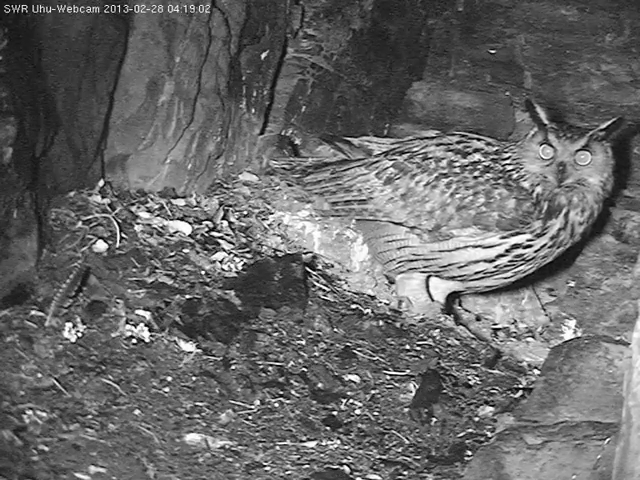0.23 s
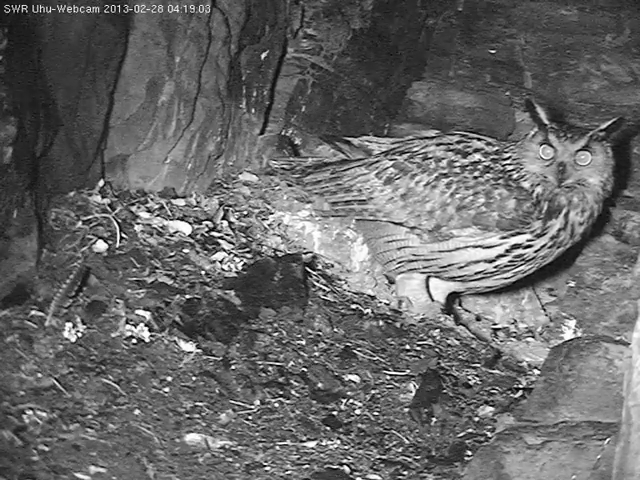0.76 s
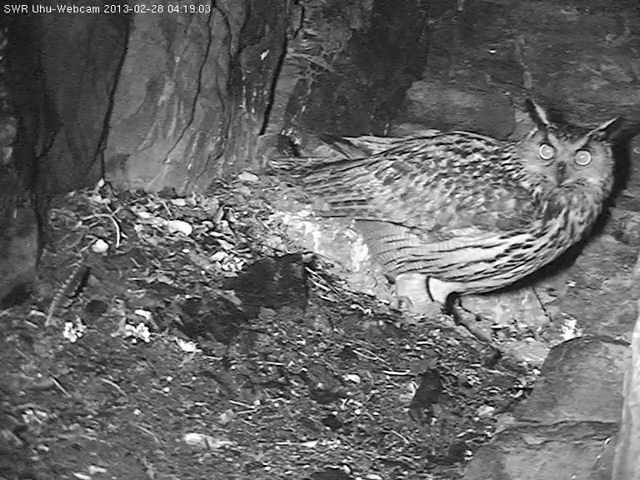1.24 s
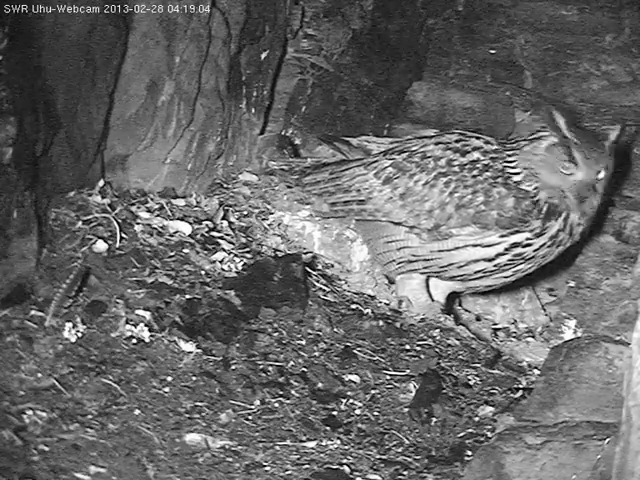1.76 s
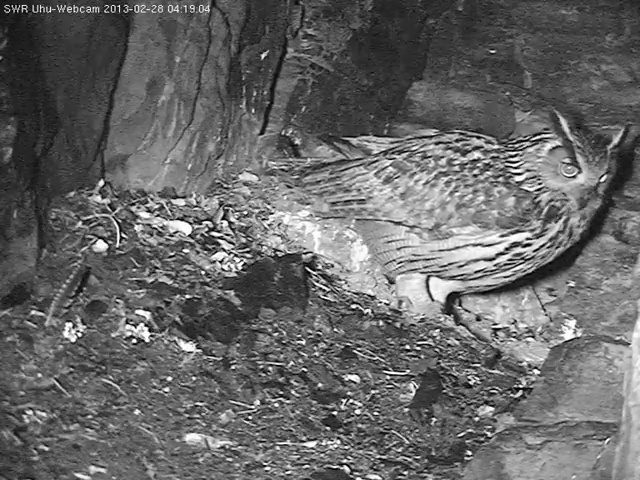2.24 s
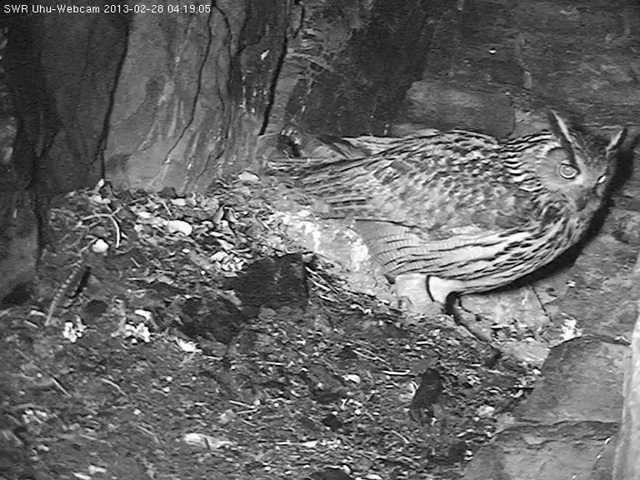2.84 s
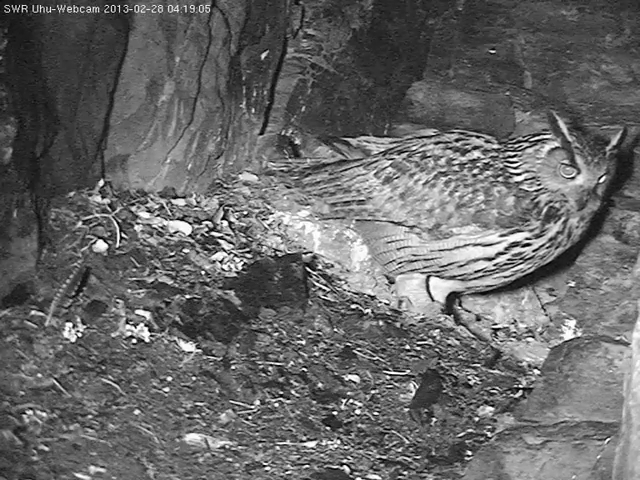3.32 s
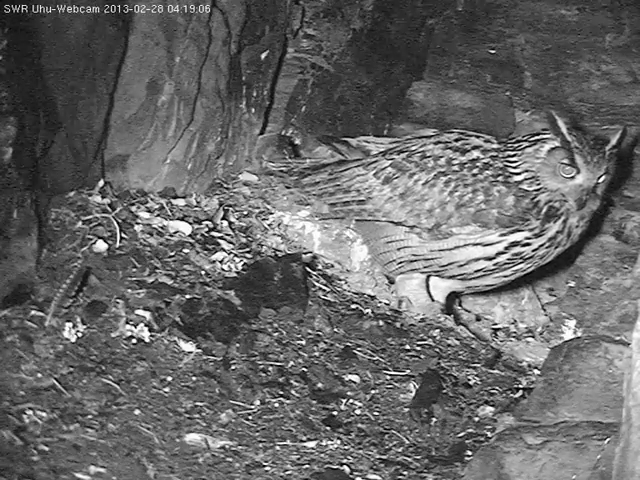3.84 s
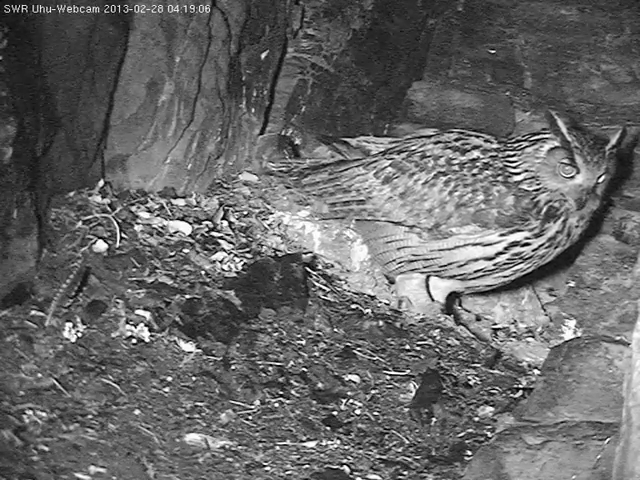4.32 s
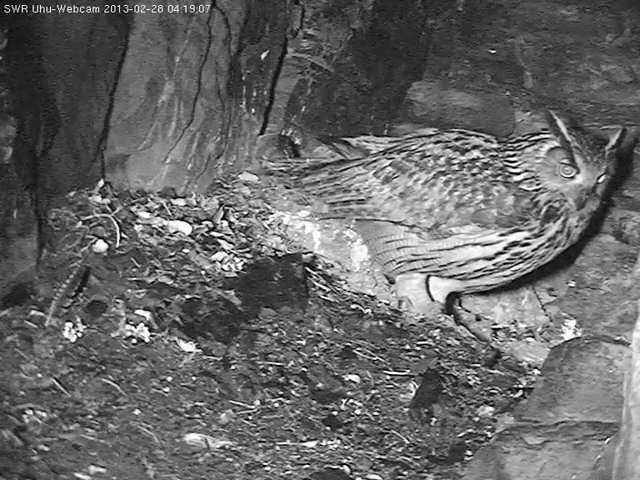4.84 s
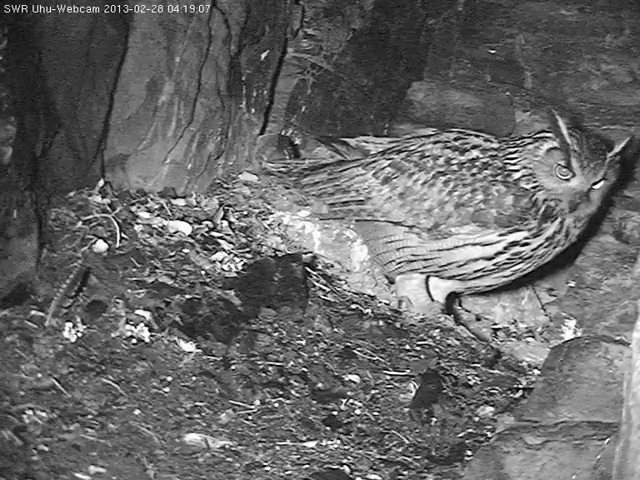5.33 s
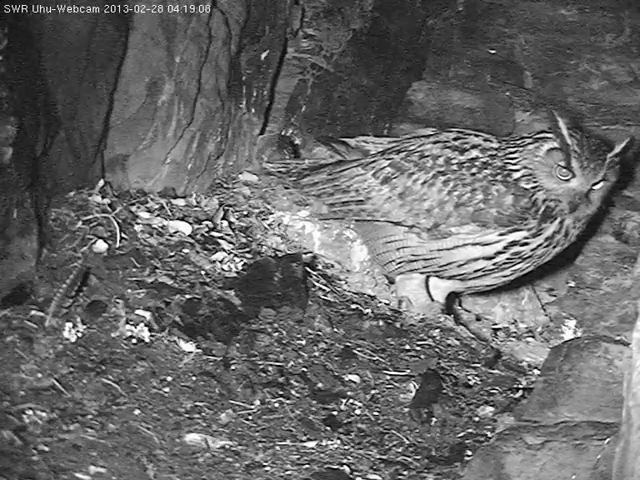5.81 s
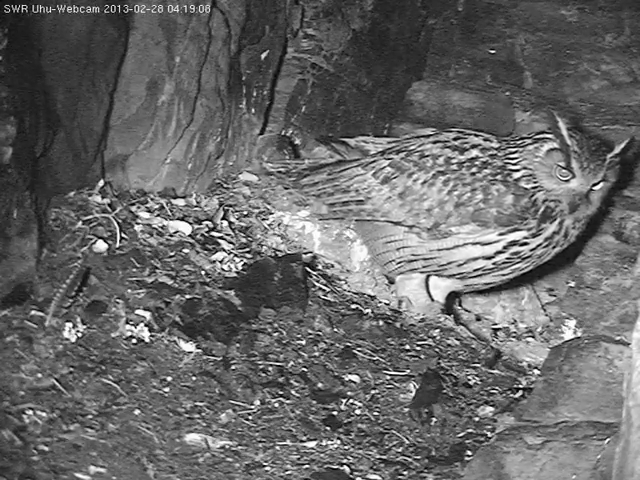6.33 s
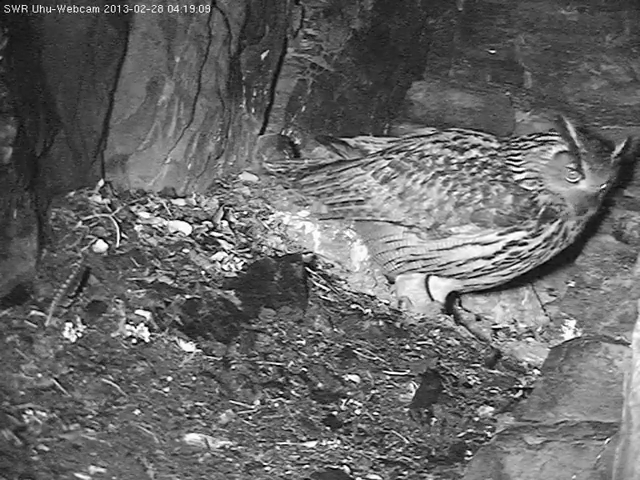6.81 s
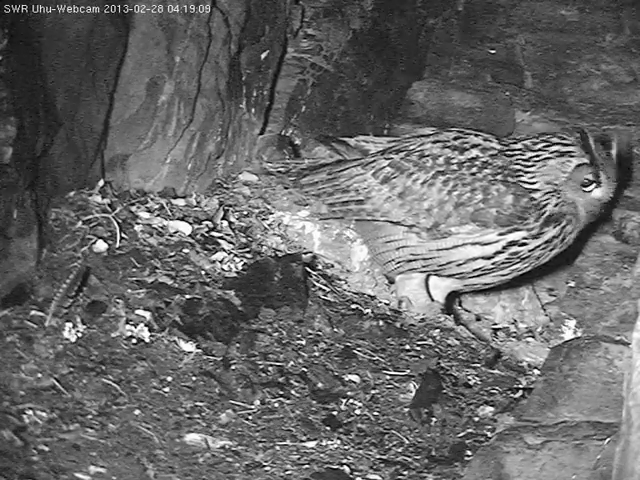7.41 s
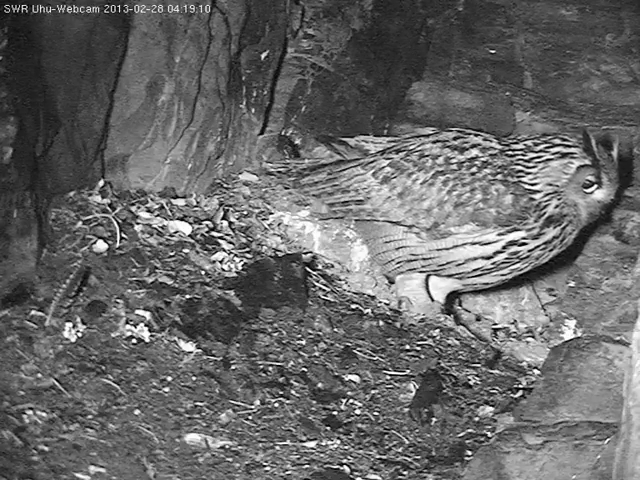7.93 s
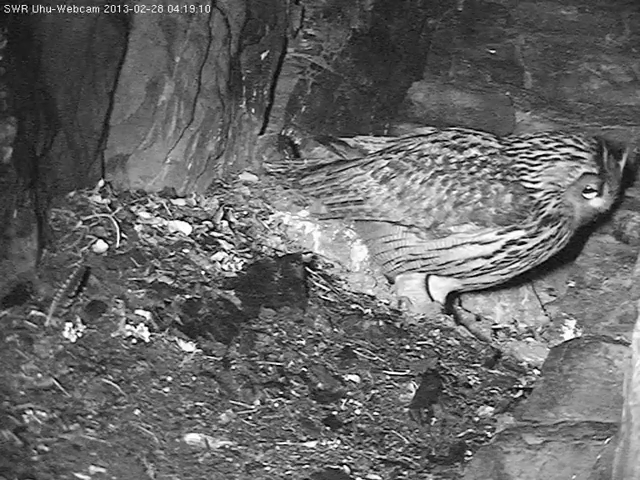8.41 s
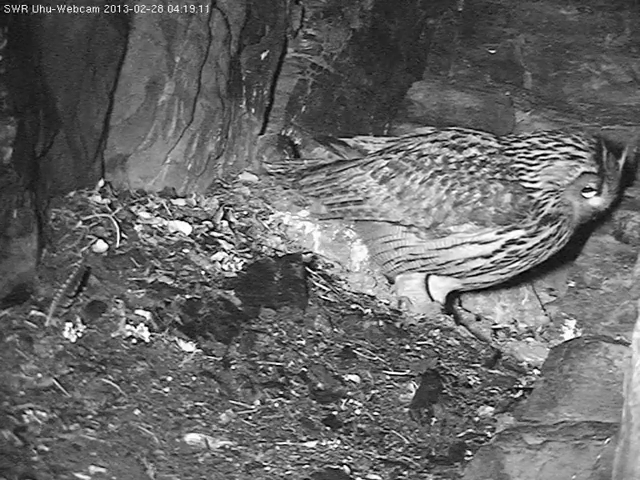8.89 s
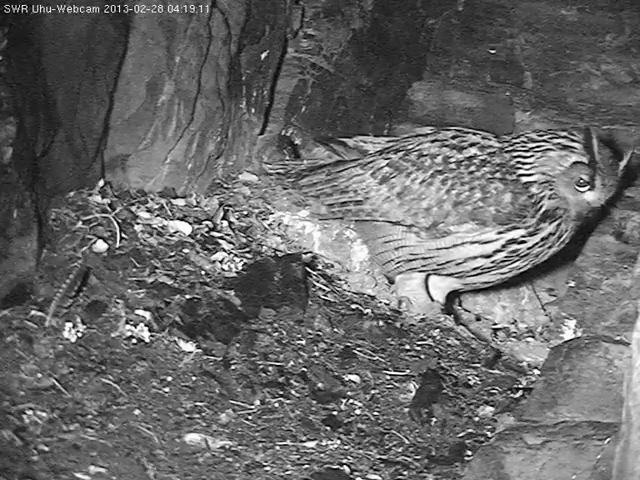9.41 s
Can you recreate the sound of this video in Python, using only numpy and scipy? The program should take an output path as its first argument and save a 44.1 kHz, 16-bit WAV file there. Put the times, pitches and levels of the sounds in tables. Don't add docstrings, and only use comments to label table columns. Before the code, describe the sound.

Quiet night air with a faint low hum and distant rush. At about 0.6 s a large owl, close by, makes a weak, creaky stutter. From 1.1 s it clucks in runs roughly every half second: each a low, hollow flutter of several quick throat pulses, rising and clipped, then a wheezy puff and often a slower closing cluck. At 2.1, 3.1 and 3.6 s longer drawls slow into a creak; around 2.66 s there is a barely felt gulp. After brief gaps near 3.8 and 4.3 s, the runs continue steadily from 4.6 s as doublets and triplets, with small nasal whistles between. Bright little gasps of air come at 6.7 and 7.3 s. From 7.8 s to the end, clucks are strongest and breathier, at 7.8, 8.3, 8.8 and 9.4 s. The sound is dry, midrange, with only a tiny rocky reflection and muted treble.

```python
import sys
import numpy as np
from scipy import signal
from scipy.fft import rfft, irfft, next_fast_len
from scipy.io import wavfile
from scipy.ndimage import uniform_filter1d

SR = 44100
rng = np.random.default_rng(int(sys.argv[2]) if len(sys.argv) > 2 else 0)


def amplitude_ratio(level_db):
    exponent = np.asarray(level_db, float) / 20
    return 10 ** exponent


def unload_wav(signal):
    wavfile.write(
        sys.argv[1],
        SR,
        np.round(np.clip(np.atleast_2d(signal).T, -1, 1) * 32767).astype(np.int16),
    )


N = 426006

# freq_hz, density_db
NIGHT_SPECTRUM = [(20, -14), (60, -7), (110, -12.5), (300, -11), (400, -6.5), (455, -0.5), (510, -9.5),
                  (1000, -8.5), (1400, -12.5), (3000, -16.5), (3500, -24), (7000, -24)]
NIGHT_DB = -58
# freq_hz, rms_db
HUM = [(50, -66.5), (150, -72.5)]
# freq_hz, t60_s
ROCK_DECAY = [(200, 0.017), (1000, 0.11), (6000, 0.015)]
# freq_hz, gain_db
MIC_RESPONSE = [(40, -12.5), (120, 4.5), (7000, -4), (7800, -8.5), (8500, -18.5), (8900, -45.5),
                (9600, -90)]

# freq_hz, width_hz
PIPE_NARROW = [(1001, 171), (553, 1210), (1810, 1600)]
PIPE_OPENED = [(885, 177), (703, 1760), (2480, 840)]
# freq_hz, width_hz, level_db
CHEST_NARROW = (167, 64, 0.7)
CHEST_OPENED = (194, 42.6, 0)
# freq_hz, width_hz, level_db
THROAT_SAC = (448.4, 63, 0)
# time_s, level_db
SAC_LEVEL = [
    (.9, 7),
    (2, 0),
]
# freq_hz, width_hz, level_db
BEAK = [(1780, 130, -1.5), (2362, 257, 0.5), (3470, 380, -5), (4310, 460, -4.5), (5180, 700, -8),
        (7130, 750, -13.5)]
# freq_hz, width_hz, level_db
BEAK_CLICK = [(1647, 150, -1), (2420, 340, -2.5), (3180, 1800, -9.5), (5400, 440, -8), (6100, 500, -12.5)]
# freq_hz, width_hz, level_db
GAPE = (3425, 150, 3.1)
# narrow_hz, opened_hz, width_hz, level_db
WHEEZE = [(500, 790, 140, -3.5), (1070, 960, 400, -2), (1232, 1000, 130, -13.5)]

# start_s, end_s, ring_db
GASPS = [
    (6.726, 6.754, 3),
    (7.327, 7.373, -5),
]
# time_s, level_db
GULPS = [
    (2.664, -24),
    (2.673, -25),
]
# start_s, length_s, level_db, octave_db (above the whistle)
SQUEAKS = [(0.683, 0.042, -51.7, 0.5), (2.046, 0.05, -45, -3.5), (2.093, 0.038, -47, -1.5),
           (2.561, 0.025, -47.5, -0.5), (2.596, 0.02, -56, 0), (2.62, 0.024, -51, 5.5),
           (3.053, 0.034, -51.5, 2), (3.532, 0.034, -48.5, -0.5), (4.664, 0.034, -49.4, 0),
           (4.74, 0.031, -53, 1.5), (5.201, 0.031, -52.5, 1), (5.725, 0.019, -58, 9),
           (5.79, 0.028, -49, -2), (6.292, 0.022, -52, -4), (6.816, 0.02, -47.5, 3), (6.911, 0.026, -50, 1),
           (7.416, 0.029, -51.5, 4.5), (7.52, 0.03, -52.5, 8), (7.936, 0.029, -49, 3),
           (7.981, 0.054, -52.5, 6), (8.423, 0.036, -51, 5), (8.513, 0.03, -62, 0),
           (8.957, 0.024, -48.5, 1.5), (9.042, 0.023, -51.5, 2.5), (9.481, 0.032, -52, 2),
           (9.578, 0.022, -51, -1)]
SQUEAK_HZ = 501

# start_s, length_s, held_hz, pulse_db, hiss_db
LEADS = [(1.0736, .0276, 244, -22.5, -59), (1.521, 0.033, 252.7, -20, -50),
         (1.9303, .0369, 262.7, -19, -47), (2.456, 0.015, 273, -19.5, -55), (2.948, .0333, 271.7, -20, -47),
         (3.417, .0355, 282.7, -19.5, -44), (3.9817, .0252, 262, -19.5, -53),
         (4.5657, .0295, 256.7, -19, -49.5), (5.0987, .0384, 250, -19, -51.5),
         (5.6029, 0.0452, 259.7, -18.5, -46.5), (6.0948, .0324, 267, -18.5, -47),
         (7.816, .0354, 268.8, -18, -43), (8.3134, .0397, 269.5, -18, -43.5),
         (8.8407, .0329, 269, -18, -45), (9.375, 0.0295, 263, -18.5, -47.5)]
LEAD_START_HZ, LEAD_RISE_S, CREEP_HZ_PER_S, LEAD_START_DB, LEAD_END_DB = 150.5, .0145, 650, -9, -1
# start_s, length_s, top_hz, last_hz, pulse_db
ARCHES = [(4.7, .0107, 186, 177, -21.5), (2.0726, .0209, 258, 229, -19), (3.562, .0163, 206, 142, -21.5),
          (5.2343, .0362, 214.6, 177, -21.5), (5.7443, .0204, 226, 133, -20.5),
          (6.2315, .0252, 264.4, 220, -19), (6.836, .0221, 256, 195, -18.5), (7.4454, .0184, 235, 217, -20),
          (8.9805, .0287, 264, 233, -18.5)]
ARCH_START_HZ, ARCH_RISE_S, ARCH_START_DB, ARCH_DB_PER_HZ = 195, .009, -4, .09
# start_s, length_s, top_hz (or dip), last_hz, pulse_db
DRAWLS = [
    (0.6334, .0292, 158, 189, -29),
    (.733, 0.064, 170, 112, -28.5),
    (2.133, .0653, 218.8, 102, -21.5),
    (3.0853, .0973, 240.8, 122, -23),
    (3.6066, 0.055, 216.3, 107.4, -23),
]
DRAWL_START_HZ, DRAWL_RISE_S, DRAWL_START_DB, DRAWL_END_DB = 181, .012, -1.5, -2
# start_s, length_s, first_hz, first_db (over the rest), pulse_db
CLOSERS = [(1.2046, 0.015, 168, -8, -27), (1.668, 0.015, 165, -8.5, -24.5),
           (4.1336, 0.043, 151.8, 2, -26.5), (5.8266, 0.027, 170, -4, -23.5),
           (6.3132, 0.034, 195, 0, -22.5), (6.9416, .0361, 171, .3, -23.5), (7.5547, .0334, 191, 2.5, -23),
           (7.9682, .007, 160, -4, -30.5), (8.0363, .0418, 175.4, -6, -21), (8.5362, 0.024, 157, -8, -20.5),
           (9.0815, 0.016, 135.9, -3, -23), (9.5156, .0074, 150.3, -3, -33),
           (9.6161, 0.0084, 130.3, -3.5, -25)]
CREAK_HZ, CLOSER_RISE_S, CLOSER_END_DB = 109.9, .007, 0.44
CLOSER_AIR_S, SPENT_DB = .0345, -5.5
LAST_BEAT_DB = -2

HISS_START_DB, HISS_OPEN_DB, HISS_OPEN_S, HISS_TOP_SHARE, HISS_END_DB = -21.5, -5, 0.0044, .65, -5
ARCH_HISS_DB, ARCH_HISS_LATE_DB, DRAWL_HISS_DB, CLOSER_HISS_DB = -37, -9, -41.5, -43.5

# start_s, length_s, wheeze_db, hiss_db
PUFFS = [(1.104, .028, -48, -59), (1.556, 0.0252, -47, -52), (1.97, 0.02215, -43, -52.5),
         (2.477, 0.03375, -45, -53), (2.984, 0.0239, -44, -52), (3.455, 0.02353, -41, -49),
         (4.012, .029, -43.5, -56), (4.599, 0.037, -44, -55), (5.14, .027, -45.5, -59),
         (5.651, 0.0203, -45.5, -56), (6.13, 0.0211, -44.5, -57.5), (6.719, .033, -42, -51.5),
         (6.861, .035, -42, -54.5), (7.325, .04, -40.5, -50.5), (7.855, 0.02416, -40, -52),
         (8.356, .022, -38, -52.5), (8.878, .025, -38, -52.5), (9.409, .028, -41.5, -54.5)]
PUFF_ATTACK_S, PUFF_RELEASE_S, PUFF_SAG_DB = .004, .009, -5
PUFF_OPENS = (.3, .9)
# start_s, length_s, wheeze_db, opening (0-1)
SIGHS = [(0.665, .066, -60.5, .15), (1.179, 0.02, -55.5, 0.16), (1.633, .022, -46, 0.77),
         (2.043, 0.02593, -49.5, 0.44), (2.096, .035, -47, 0.66), (2.528, .11, -48.5, .85),
         (3.056, .028, -51.5, .5), (3.522, .038, -52, 0.7), (4.044, .08, -63.5, .5),
         (4.629, .07, -48.5, 0.62), (4.722, .045, -45.5, .8), (5.186, .045, -50.5, .6),
         (5.286, .032, -47.5, .95), (5.714, 0.0283, -50, 0.62), (5.763, .055, -48, 0.5),
         (6.206, .022, -50.5, 0.28), (6.254, .053, -44.5, 0.52), (6.805, 0.01996, -48.5, .4),
         (6.889, .05, -46, 0.66), (7.399, .045, -45, .7), (7.462, .087, -44.5, 0.76),
         (7.928, .036, -48, 0.51), (7.981, .05, -44, .4), (8.402, .055, -45, .75), (8.462, .07, -45, .7),
         (8.919, .06, -54, .8), (9.009, .066, -48, 0.67), (9.461, .052, -44, .85), (9.532, 0.021, -45, .5),
         (9.553, .048, -43, .9)]
SIGH_ATTACK_S, SIGH_RELEASE_S, SIGH_SAG_DB, SIGH_HISS_DB, SIGH_CLOSES = .008, .016, -2, -14, .15
WIDE_HISS_DB = -8


def unit(x):
    return x / np.sqrt(np.mean(x ** 2) + 1e-20)


def along(points, hz):
    f, v = np.transpose(points)
    return np.interp(np.log(hz + 1), np.log(f + 1), v)


def filtered(x, response):
    m = next_fast_len(N + SR // 2)
    return irfft(rfft(x, m) * response(np.fft.rfftfreq(m, 1 / SR)), m)[..., :N]


def series(modes):
    return lambda f: np.prod([c * c / (c * c - f * f + 1j * f * w) for c, w in modes], axis=0)


def parallel(modes):
    def response(f):
        total = 0
        for k, (c, w, db) in enumerate(modes):
            total = total + (-1) ** k * amplitude_ratio(db) * 1j * f * w / (c * c - f * f + 1j * f * w)
        return total
    return response


def spikes(s, size):
    i, part = np.divmod(s * SR, 1)
    places = np.r_[i, i + 1].astype(int)
    return np.bincount(places, np.r_[size * (1 - part), size * part], N + 2)[:N]


def night():
    z = signal.stft(rng.standard_normal(N), nperseg=512)[2]
    patches = uniform_filter1d(rng.standard_normal(z.shape), size=5, axis=0)
    patches = uniform_filter1d(patches, size=12, axis=1)
    rush = signal.istft(z * amplitude_ratio(.6 * unit(patches)), nperseg=512)[1][:N]
    rush = amplitude_ratio(NIGHT_DB) * unit(filtered(rush, lambda hz: amplitude_ratio(along(NIGHT_SPECTRUM, hz))))
    drift = amplitude_ratio(1.5 * unit(uniform_filter1d(rng.standard_normal(N), size=4000)))
    t = np.arange(N) / SR
    hum = sum(np.sqrt(2) * amplitude_ratio(db) * np.sin(2 * np.pi * hz * t) for hz, db in HUM)
    return rush + drift * hum


def rock(x):
    hz, t, z = signal.stft(rng.standard_normal(SR // 8), SR, nperseg=128)
    decay = amplitude_ratio(-60 * t / along(ROCK_DECAY, hz)[:, None])
    tail = signal.istft(z * decay, SR, nperseg=128)[1]
    delayed = np.pad(x, (130, 0))
    return signal.fftconvolve(delayed, tail / np.linalg.norm(tail))[:N]


def squeaks():
    tone, shut = np.zeros(N), np.zeros(N)
    variation = rng.standard_normal((len(SQUEAKS), 2))
    for (s, length, db, octave_db), (detune, lag) in zip(SQUEAKS, variation):
        u = np.linspace(0, 1, round(length * SR))
        waver = 100 * uniform_filter1d(rng.standard_normal(len(u)), size=90)
        hz = SQUEAK_HZ * (1.05 - 0.14 * u) + 6 * detune + waver
        turn = 2 * np.pi * np.cumsum(hz) / SR
        swell = np.sin(np.pi * u) ** 1.7
        whistle = np.sin(turn) + amplitude_ratio(octave_db) * np.sin(2 * turn + lag)
        tone[round(s * SR):][:len(u)] += np.sqrt(2) * amplitude_ratio(db) * swell * whistle
        shut[round(s * SR):][:len(u)] = np.sqrt(swell)
    return tone, shut


def clucks():
    for s, length, hz, db, hiss_db in LEADS:
        rise, top = min(LEAD_RISE_S, .99 * length), HISS_TOP_SHARE * length
        opens = [min(rise, top) - HISS_OPEN_S, min(rise + HISS_OPEN_S / 2, .9 * top)]
        at = np.sort([0, rise, top, length, *opens])
        knots = [0, rise, length]
        rate = np.interp(at, knots, [LEAD_START_HZ, hz, hz + CREEP_HZ_PER_S * (length - rise)])
        size = db + np.interp(at, knots, [LEAD_START_DB, 0, LEAD_END_DB])
        hiss_shape = [HISS_START_DB, HISS_OPEN_DB, 0, HISS_END_DB]
        yield s + at, rate, size, hiss_db + np.interp(at, [*opens, top, length], hiss_shape)
    for s, length, hz, last, db in ARCHES:
        at = np.array([0, ARCH_RISE_S, length])
        size = db + np.array([ARCH_START_DB, 0, ARCH_DB_PER_HZ * (last - hz)])
        hiss = size + ARCH_HISS_DB + np.array([ARCH_HISS_LATE_DB, 0, 0])
        yield s + at, [ARCH_START_HZ, hz, last], size, hiss
    for s, length, hz, last, db in DRAWLS:
        at = np.array([0, DRAWL_RISE_S, length])
        size = db + np.array([DRAWL_START_DB, 0, DRAWL_END_DB])
        yield s + at, [DRAWL_START_HZ, hz, last], size, size + DRAWL_HISS_DB
    for s, length, hz, first_db, db in CLOSERS:
        rise = min(CLOSER_RISE_S, .9 * length)
        end_db = CLOSER_END_DB + SPENT_DB * (length > CLOSER_AIR_S)
        size = db + np.array([first_db, 0, CLOSER_END_DB, end_db])
        at = np.array([0, rise, max(rise, length - 1 / CREAK_HZ), length])
        yield s + at, hz + (CREAK_HZ - hz) * at / length, size, size + CLOSER_HISS_DB


def beats():
    rows = []
    for s, hz, db, _ in clucks():
        held = hz[-1] > 1.15 * hz[0]
        t = np.arange(s[0], s[-1] + .5 / hz[-1], 1 / SR)
        turns = np.cumsum(np.interp(t, s, hz)) / SR
        whole = int(turns[-1])
        fit = 1 if held else whole / (turns[-1] - .5)
        beat = np.arange(whole + 1)
        when = np.interp(beat, fit * turns, t)
        rebound_db = 1.2 * (beat == 1) - 2.1 * (beat == 2)
        rebound_db += LAST_BEAT_DB * (beat == beat[-1]) * (len(beat) > 6)
        rows.append([when, fit * np.interp(when, s, hz), np.interp(when, s, db) + rebound_db])
    return np.hstack(rows)


def airflow():
    t = np.arange(N) / SR
    wheeze, hiss, opened = np.zeros((3, N))
    for s, _, _, hiss_db in clucks():
        on = slice(round(s[0] * SR), round((s[-1] + PUFF_ATTACK_S) * SR))
        hiss[on] += amplitude_ratio(np.interp(t[on], s, hiss_db))
    breaths = [(*row, PUFF_ATTACK_S, PUFF_RELEASE_S, PUFF_SAG_DB, *PUFF_OPENS) for row in PUFFS]
    for s, length, db, wide in SIGHS:
        hiss_db = db + SIGH_HISS_DB + WIDE_HISS_DB * (wide - .5)
        breaths.append((s, length, db, hiss_db, SIGH_ATTACK_S, SIGH_RELEASE_S, SIGH_SAG_DB,
                        wide + SIGH_CLOSES, wide - SIGH_CLOSES))
    for s, length, db, hiss_db, attack, release, sag_db, first, last in breaths:
        on = slice(round((s - attack / 2) * SR), round((s + length + release / 2) * SR))
        u = t[on] - s
        flow = np.clip(np.minimum(u / attack, (length - u) / release) + .5, 0, 1) ** 2
        pipe = flow * amplitude_ratio(db + sag_db * (u / length - .5))
        wheeze[on] += pipe
        hiss[on] += amplitude_ratio(hiss_db) * flow
        opened[on] += pipe * (first + (last - first) * u / length)
    return wheeze, hiss, np.clip(opened / (wheeze + 1e-9), 0, 1)


def blown(hz, width_hz):
    a, b = filtered(rng.standard_normal((2, N)), lambda f: 1 / (1 + 2j * f / width_hz) ** 2)
    turn = 2 * np.pi * np.cumsum(hz) / SR
    return unit(a * np.cos(turn) + b * np.sin(turn))


def windpipe_breath(opening):
    return sum(amplitude_ratio(db) * blown(low + (high - low) * opening, width) for low, high, width, db in WHEEZE)


def beak_noise(hiss, s, hz, effort, voiced, gusts):
    clicks = spikes(s - .0007, np.sqrt(SR / hz) * (0.62 + 0.49 * effort))
    burst = signal.fftconvolve(clicks, np.exp(-np.arange(300) / (.0011 * SR)))[:N] / 5
    air = hiss * rng.standard_normal(N) * ((1 - .85 * voiced) * gusts + .3 * burst)
    t = np.arange(N) / SR
    wide = sum(amplitude_ratio(db) * ((t > a) & (t < b)) for a, b, db in GASPS)
    scale = np.std(filtered(rng.standard_normal(N), parallel(BEAK)))
    beak = filtered(air, parallel(BEAK))
    beak += filtered(hiss * clicks, parallel(BEAK_CLICK))
    beak += filtered(air * wide, parallel([GAPE]))
    return beak / scale


def pulse(pipe, chest, push, low_hz):
    def response(f):
        early = np.exp(2j * np.pi * f * 0.00069)
        body = series(pipe)(f) * (push * early - 1) - amplitude_ratio(chest[2]) * series([chest[:2]])(f)
        return body * 1j * f / (low_hz + 1j * f)
    return response


def voice(s, hz, db, effort):
    scatter_db = (.9 - .5 * effort) * rng.standard_normal(len(s))
    size = amplitude_ratio(db + 23.5 + scatter_db)
    narrow = pulse(PIPE_NARROW, CHEST_NARROW, push=0.53, low_hz=141)
    opened = pulse(PIPE_OPENED, CHEST_OPENED, push=1.14, low_hz=185)
    sound = filtered(spikes(s, size * (1 - effort)), narrow)
    sound += filtered(spikes(s, size * effort * amplitude_ratio(-2.5)), opened)
    sac_db = np.interp(np.arange(N) / SR, *np.transpose(SAC_LEVEL))
    return sound + filtered(sound * amplitude_ratio(sac_db), parallel([THROAT_SAC]))


def gulps():
    s, db = np.transpose(GULPS)
    return -filtered(spikes(s, amplitude_ratio(db + 6)), pulse([(200, 340)], CHEST_NARROW, push=0, low_hz=60))


def owl():
    s, hz, db = beats()
    s = s - .0008
    effort = np.clip((hz - 185) / 70, 0, 1)
    wheeze, hiss, opening = airflow()
    whistle, shut = squeaks()
    voiced = np.clip(uniform_filter1d(spikes(s + .001, SR / hz), size=300) * 1.5, 0, 1)
    gusts = amplitude_ratio(2.5 * unit(uniform_filter1d(rng.standard_normal(N), size=350)))
    breath = wheeze * (1 - voiced) * (1 - 0.72 * shut) * gusts * windpipe_breath(opening)
    beak = beak_noise(hiss, s, hz, effort, voiced, gusts)
    return voice(s, hz, db, effort) + gulps() + whistle + amplitude_ratio(-5.5) * breath + amplitude_ratio(2.0) * beak


def scene():
    bird = owl()
    return (bird + amplitude_ratio(-26.5) * rock(bird) + night())[None]


def band_limit(x):
    return signal.sosfilt(signal.butter(12, 8810, fs=SR, output="sos"), x)


def record(dry):
    soft = dry / (1 + np.abs(dry / .19) ** 4) ** (1 / 4)
    mix = filtered(soft, lambda hz: amplitude_ratio(along(MIC_RESPONSE, hz)))
    return band_limit(mix)


dry = scene()
out = record(dry)
unload_wav(out)
```